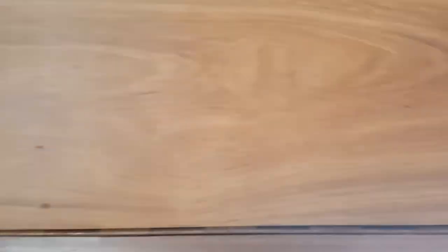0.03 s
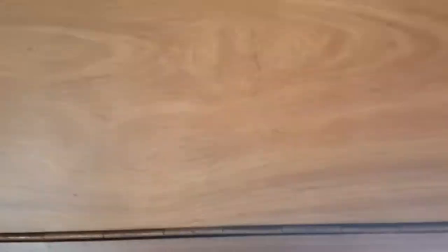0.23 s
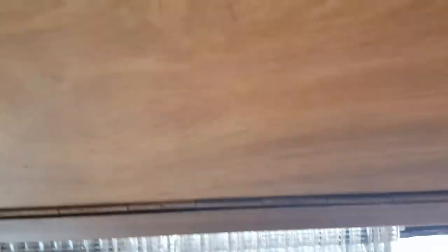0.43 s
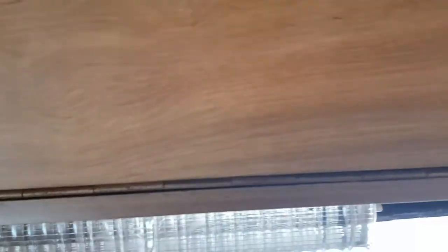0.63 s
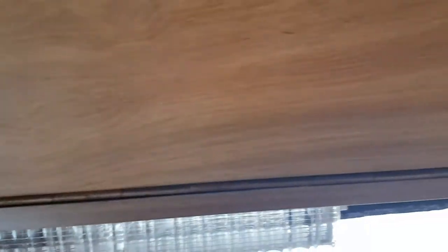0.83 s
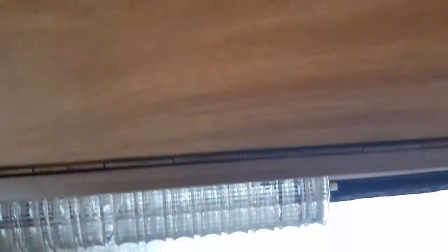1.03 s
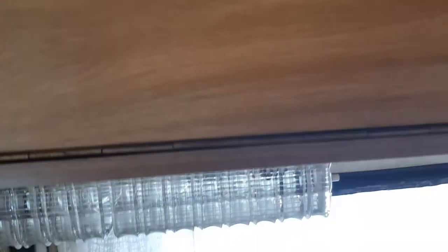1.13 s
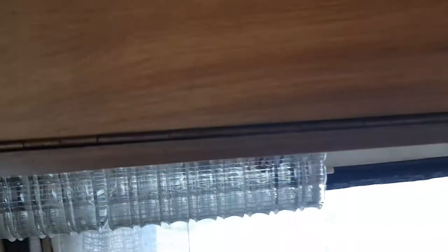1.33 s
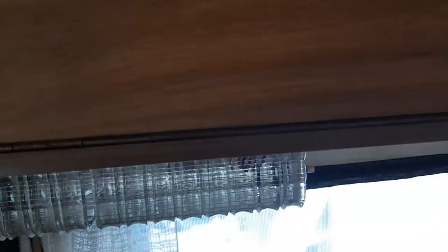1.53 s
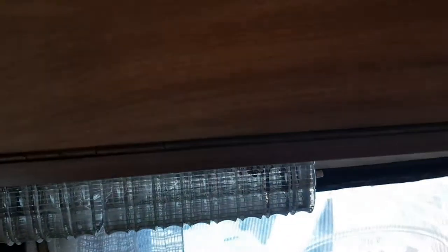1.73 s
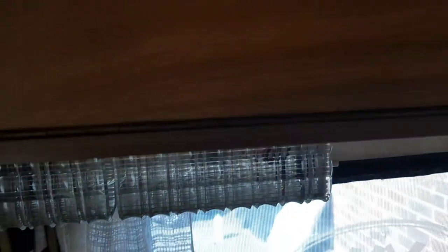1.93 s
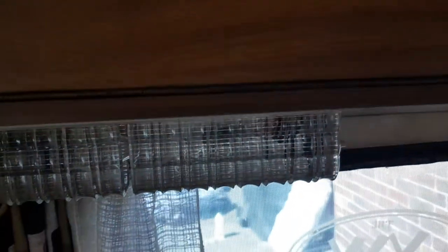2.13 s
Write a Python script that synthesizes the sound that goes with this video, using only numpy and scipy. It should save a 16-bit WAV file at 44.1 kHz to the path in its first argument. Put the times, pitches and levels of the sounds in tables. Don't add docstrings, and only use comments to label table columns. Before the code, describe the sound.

A wooden overhead locker door scrapes briefly, its catch snaps loudly with a low panel thud, then fingers knock, tick and brush until a softer second snap; close handheld stereo microphone in a small padded caravan.

```python
import sys
import numpy as np
from scipy import signal
from scipy.fft import rfft, irfft, next_fast_len
from scipy.io import wavfile
from scipy.ndimage import map_coordinates

SR = 44100
rng = np.random.default_rng(int(sys.argv[2]) if len(sys.argv) > 2 else 0)


def level_to_linear(level):
    exponent = np.asarray(level, float) / 20
    return 10 ** exponent


def to_wav(sig):
    pcm = np.clip(np.atleast_2d(sig), -1, 1) * 32767
    pcm = np.round(pcm).astype(np.int16)
    wavfile.write(sys.argv[1], SR, pcm.T)


N = 97020
SNAP_WET_DB = -3.5


def unit(x):
    return x / np.sqrt(np.mean(x ** 2) + 1e-20)


def along(points, hz):
    f, v = np.transpose(points)
    return np.interp(np.log(hz + 1), np.log(f + 1), v)


def curve(rows):
    s, v = np.transpose(rows)
    return np.interp(np.arange(N) / SR, s, v)


def wobble(rate_hz):
    knots = rng.standard_normal(int(N * rate_hz / SR) + 4)
    return map_coordinates(knots, [np.arange(N) * rate_hz / SR])


def filtered(x, response):
    m = next_fast_len(N + SR // 2)
    return irfft(rfft(x, m) * response(np.fft.rfftfreq(m, 1 / SR)), m)[..., :N]


def resonance(x, centre_hz, width_hz):
    def response(hz):
        loss = 1j * hz * width_hz
        return loss / (centre_hz ** 2 - hz ** 2 + loss)
    return filtered(x, response)


def noise(spectrum, alike):
    shared, left, right = rng.standard_normal((3, N))
    share = np.clip(alike, 0, 1)
    pair = np.sqrt(share) * shared + np.sqrt(1 - share) * np.array([left, right])
    return unit(filtered(pair, lambda hz: level_to_linear(along(spectrum, hz))))


def pan(side_db):
    return level_to_linear([[side_db], [-side_db]])


def add(out, s, sound):
    part = out[..., round(s * SR):][..., :sound.shape[-1]]
    part += sound[..., :part.shape[-1]]


def placed(sound, s):
    # time in seconds, extra lag of the left port in samples.
    contact = [(.3, 0), (.6, 4), (.69, -4), (1.03, -3), (1.13, 1), (1.3, -1)]
    extra = round(np.interp(s, *np.transpose(contact)))
    return np.array([np.roll(sound[0], max(extra, 0)), np.roll(sound[1], max(-extra, 0))])


def cabin(x):
    # frequency in Hz, t60 in seconds.
    wall_t60 = [(100, 0.3), (400, 0.072), (1500, 0.083), (8000, 0.088), (15000, 0.039)]
    mono_hz = 452
    hz, t, z = signal.stft(rng.standard_normal((2, SR // 6)), SR, nperseg=256)
    apart = (hz / (hz + mono_hz))[:, None] ** 2
    z = np.array([z[0] + apart * z[1], z[0] - apart * z[1]]) / np.sqrt(1 + apart ** 2)
    decay = level_to_linear(-60 * t / along(wall_t60, hz)[:, None])
    tail = signal.istft(z * decay, SR, nperseg=256)[1]
    late = np.pad(x, ((0, 0), (90, 0)))
    return signal.fftconvolve(late, tail / np.linalg.norm(tail[0]), axes=1)


def knocks():
    # start in seconds, peak in dB, pitch favoured by the contact in Hz, damping factor.
    blows = [(.007, -26, 205, 1.9), (.060, -32, 212, 0.26), (.2037, -9.5, 241, 0.86),
             (0.2227, -13.5, 180, 1.15), (.213, -15.5, 55.7, 0.97), (.2195, -17.5, 115.5, 0.93),
             (0.287, -33.5, 55.5, 0.72), (.347, -36, 156, 1.63), (.395, -50, 692, 1.15),
             (0.562, -46.5, 150, 1.4), (.603, -38.5, 300, 0.52), (0.62, -23.5, 97.2, 2),
             (.696, -26, 426, 3.8), (.72, -33.5, 65.5, 0.95), (.835, -42, 240, 1.5),
             (.993, -31.5, 240, 1.94), (1.001, -23, 120.5, 2.3), (1.016, -33.5, 64.4, 1.1),
             (1.080, -35.5, 404, 1.8), (1.092, -27.5, 110, 2.7), (1.141, -37.5, 207, 1.1),
             (1.339, -43.5, 680, 1.2), (1.355, -35, 180, 1.06), (1.376, -38, 750, 2.1),
             (1.517, -44.5, 210, 0.81), (1.569, -20, 542, 2.2), (1.573, -23.5, 300, 0.72),
             (1.5805, -19.5, 195.4, 1.28), (1.578, -21.5, 61.6, 1.1), (1.585, -23.5, 118, 4.5),
             (1.611, -24.5, 115, 1.9), (1.655, -40, 105, 0.94), (1.692, -37, 95, 1.4),
             (1.772, -48, 196, 0.9), (1.821, -44, 798, 1.3), (1.994, -44.5, 127, 0.97),
             (2.177, -44.5, 650, 1.44)]
    # frequency in Hz, level in dB, t60 in seconds.
    modes = [(58.7, 0.5, 0.17), (88, -10.5, .12), (119, -2, 0.13), (180, -2.5, 0.15), (206.4, -1.5, 0.095),
             (240, -1, 0.054), (300, -13, 0.076), (407.6, -2, 0.082), (456.6, -8, 0.15), (650, -10, 0.09),
             (737.7, -11.5, 0.1), (938, -13, 0.05), (1077, -16, 0.016), (1447, -14.5, 0.12)]
    spread_oct, skirt_db, rise_cycles = 0.24, -16.5, 0.38
    under_db = 9
    thud_db, wet_db = 3, -17
    out, t = np.zeros((2, N)), np.arange(SR // 4) / SR
    hz, level_db, t60 = np.transpose(modes)[..., None]
    rise = 1 - np.exp(-t * hz / rise_cycles)
    for s, db, pitch_hz, damping in blows:
        octaves = np.log2(hz / pitch_hz)
        favoured = np.exp(-.5 * (octaves / spread_oct) ** 2)
        weight = favoured + level_to_linear(skirt_db + under_db * np.minimum(octaves, 0))
        decay_db = 60 * t * np.clip(damping, .3, 4) / t60
        gain = weight * level_to_linear(level_db + 1.5 * rng.standard_normal(hz.shape) - decay_db)
        ring = (gain * np.sin(2 * np.pi * hz * t) * rise).sum(0)
        knock = level_to_linear(db + thud_db) * np.array([ring, np.roll(ring, shift=7)])
        add(out, s, knock)
        add(out, s, level_to_linear(wet_db) * cabin(knock))
    return out


def clicks():
    # start in seconds, peak in dB, pitch in Hz, fizz in dB, fizz tilt in dB per octave.
    catch = [
        (0.1978, -19, 10600, 1.5, 2.5),
        (.2000, -8, 3010, -11, -6.5),
        (.2045, -23.5, 1411, -0.5, -3.5),
        (0.2127, -13.5, 2930, -10, -5),
        (0.219, -28.5, 2778, 1.5, -31),
        (1.5690, -32, 1160, 2, -3),
        (1.5733, -20, 3030, -3.5, -5),
    ]
    ticks = [(0.35, -52, 880, 3.5, -12), (0.395, -46.5, 996, 3.5, -13.5), (0.6016, -37.5, 2850, 0, -0.5),
             (0.61, -34.5, 5820, -12, -1.5), (.622, -34, 6530, -4, -4), (.6963, -34.5, 2645, -1, 2),
             (.9935, -45, 682, 3.5, -7.5), (1.0186, -30.5, 11600, -5.5, 2.5),
             (1.0215, -22.5, 6020, -28.5, 7), (1.0867, -37, 6830, -4.5, -1), (1.1346, -31.5, 2765, -4, 3),
             (1.139, -31.5, 4630, -9.5, -1.5), (1.146, -38, 3100, -6.5, 3), (1.216, -42.5, 1940, -3, -5.5),
             (1.341, -44.5, 718, 5, -7), (1.344, -50, 2840, 0, -5), (1.375, -37, 2764, -0.5, -5.5),
             (1.4404, -62.5, 9080, -10, 3), (1.516, -60.5, 3000, -0.5, -4.5), (1.667, -59, 4870, 0, -2),
             (1.789, -51.5, 4700, -4, -4.5), (1.8450, -42.5, 5970, -3, 4), (1.936, -50.5, 12960, -24.5, 15),
             (1.991, -46.5, 4660, -10, 1.5), (2.181, -62.5, 870, -1.5, 7.5)]
    # frequency in Hz, level in dB.
    fizz_spectrum = [(400, -1.5), (900, -0.5), (3500, -8), (12000, -21), (16500, -35)]
    catch_cycles, tick_cycles = 0.5, 7.5
    fizz_t60_s, fizz_rise_s = 0.023, 0.0005
    click_db, wet_db, side_db = 3.5, -2, 0.23
    out, t = np.zeros((2, N)), np.arange(SR // 10) / SR
    fizz, band_hz = noise(fizz_spectrum, 0.48), np.fft.rfftfreq(len(t), 1 / SR)
    fizz_shape = level_to_linear(-60 * t / fizz_t60_s) * np.minimum(t / fizz_rise_s, 1) ** 2
    events = [(row, catch_cycles) for row in catch] + [(row, tick_cycles) for row in ticks]
    for (s, db, hz, fizz_db, tilt_db), cycles in events:
        turns = hz * t
        snap = -np.sin(2 * np.pi * turns) * np.minimum(turns, 1) ** 2 * level_to_linear(-20 * (turns - 1) / cycles)
        piece = fizz[:, rng.integers(N - len(t)):][:, :len(t)]
        tilt = level_to_linear(tilt_db * np.log2((band_hz + 300) / 3000))
        burst = unit(irfft(rfft(piece) * tilt, len(t))) * level_to_linear(fizz_db) * fizz_shape
        gain = level_to_linear(db + click_db) * pan(side_db)
        add(out, s, placed(gain * (snap + burst), s))
        add(out, s, level_to_linear(wet_db) * cabin(gain * (level_to_linear(SNAP_WET_DB) * snap + burst)))
    return out


def pings():
    # start in seconds, peak in dB, pitch in Hz, t60 in seconds, left over right in dB.
    rings = [(.2, -17, 740, 0.043, 1.5), (.205, -23.5, 960, 0.077, 3), (.201, -24, 1425, .07, -5),
             (.2, -20, 452, 0.066, -5), (.603, -32.5, 4030, 0.038, -5.5), (.603, -40, 2814, .04, -2.5),
             (.603, -44, 2240, 0.033, -3), (0.6968, -35, 3386, 0.021, 14), (.995, -46.5, 1474, 0.045, 7),
             (1.135, -35, 2817, 0.047, 3), (1.138, -27, 3647, 0.022, -5), (1.136, -35, 2250, 0.039, -1),
             (1.216, -42, 1570, 0.051, 6.5), (1.344, -42, 1418, 0.061, 4), (1.373, -36, 1450, 0.032, -3),
             (1.376, -40, 723, .06, -1), (1.571, -40.5, 727, .05, -1.5), (1.571, -35, 968, 0.039, -14),
             (1.571, -42, 1350, 0.043, 7), (1.821, -52, 1450, .06, 7.5), (1.845, -53, 2780, 0.033, 3)]
    # start in seconds, swell length in seconds (negative inverts the wave), level in dB,
    # start pitch in Hz, glide in Hz per second, left over right in dB.
    squeak = (1.3, -0.7, -46, 1000, 26000, -8)
    rise_s = 0.00077
    out, t = np.zeros((2, N)), np.arange(SR // 8) / SR
    s, length_s, db, hz, glide, pan_db = squeak
    swell = np.sin(np.pi * np.minimum(t / length_s, 1))
    slip = np.sin(2 * np.pi * (hz + glide * t / 2) * t) * swell
    add(out, s, level_to_linear(db) * pan(pan_db / 2) * slip)
    for s, db, hz, t60, pan_db in rings:
        ring = np.sin(2 * np.pi * hz * t) * level_to_linear(db - 60 * t / t60) * (1 - np.exp(-t / rise_s))
        ring = pan(pan_db / 2) * ring
        add(out, s, placed(ring, s))
        add(out, s, level_to_linear(SNAP_WET_DB) * cabin(ring))
    return out


def swing():
    # frequency in Hz, width in Hz, start level in dB, gain by the end in dB.
    hinge = [(205, 41, -4, -0.5), (650, 150, -9.5, -2), (1472, 150, -16.5, -0.5), (2880, 130, -9, -16),
             (3460, 240, -32, 14.5), (4220, 250, -35.5, 8)]
    level_db, end_s = -44.5, 0.19
    t, out = np.arange(N) / SR, 0
    moving = np.arange(N) < end_s * SR
    for hz, width_hz, db, gain_db in hinge:
        slip_db = gain_db * np.minimum(t / end_s, 1) + 2.5 * wobble(25) + 3 * wobble(200)
        rough = rng.standard_normal(N) + 0.78 * rng.standard_normal((2, N))
        out = out + resonance(moving * level_to_linear(db + slip_db) * rough, hz, width_hz)
    out[1] = np.roll(out[1], 29)
    return level_to_linear(level_db) * out / np.std(out[:, moving])


def hand():
    # time in seconds, level in dB.
    rub, press = [(0, -54.5), (.19, -48), (.23, -67.5), (.44, -73.5), (.56, -67.5), (.68, -57), (.8, -69),
                  (.98, -81.5), (1.03, -53), (1.26, -55), (1.31, -69.5), (1.38, -60.5), (1.46, -87),
                  (1.77, -88), (1.86, -69.5), (2.0, -65.5), (2.13, -85), (2.2, -68)], [(0, -40), (.19, -37), (.3, -54.5), (.46, -56), (.58, -43), (.75, -50.5),
                               (.84, -49.5), (.96, -56.5), (1.05, -43.5), (1.26, -44.5), (1.32, -54),
                               (1.46, -56.5), (1.54, -50.5), (1.75, -64.5), (1.86, -42.5), (1.93, -65),
                               (2.02, -50), (2.1, -56)]
    # frequency in Hz, level in dB.
    cloth, wood = [(290, -41), (500, -7.5), (659, -12.5), (1260, -11.5), (3390, -14), (16000, -30.5)], [(24, -32.5), (40, 1.5), (236, -0.5), (527, -18), (642, -18), (1500, -37),
                                  (1950, -59.5), (3300, -120)]
    grain_db = 1.5 * wobble(60) + 2 * wobble(400)
    lumps_db = 2.5 * wobble(30) + 1.5 * wobble(90)
    rustle = unit(level_to_linear(grain_db) * noise(cloth, 0.15))
    grumble = unit(level_to_linear(lumps_db) * noise(wood, 0.91))
    return level_to_linear(curve(rub)) * rustle + level_to_linear(curve(press)) * grumble


def brush():
    # start in seconds, length in seconds, level in dB.
    strokes = [
        (.33, 0.075, -67.5),
        (0.492, 0.14, -54.5),
        (0.769, 0.15, -61.5),
        (1.037, 0.11, -51),
        (1.181, 0.075, -56.5),
        (1.643, 0.065, -67),
        (1.797, 0.12, -60),
        (1.965, 0.073, -66.5),
    ]
    # frequency in Hz, width in Hz, level in dB.
    grain = [(300, 120, -2), (443, 69, 1), (650, 110, 6), (920, 48, -15), (1180, 140, -9.5),
             (1450, 130, -14.5)]
    t, stroke, out = np.arange(N) / SR, 0, 0
    for s, length_s, db in strokes:
        stroke = stroke + level_to_linear(db) * np.sin(np.pi * np.clip((t - s) / length_s, 0, 1)) ** 2
    for hz, width_hz, db in grain:
        rough = rng.standard_normal(N) + .5 * rng.standard_normal((2, N))
        out = out + resonance(level_to_linear(db + 2.5 * wobble(24)) * rough, hz, width_hz)
    return stroke * unit(out)


def scene():
    lag_s = 15 / 44100
    near = knocks() + clicks() + pings() + swing() + hand() + brush()
    return filtered(near, lambda hz: np.exp(np.outer([-1j, 1j], np.pi * hz * lag_s)))


def handling():
    shake_db = -53 + 5.5 * wobble(39)
    return level_to_linear(shake_db) * noise([(35, -1.5), (110, -3.5), (400, -57.5)], 0.93)


def microphone_hiss():
    # frequency in Hz, level in dB.
    hiss_spectrum = [(400, -13.5), (2500, -31.5), (4900, -24.5), (9000, -29.5), (15300, -18), (15900, -70)]
    return level_to_linear(-72.5) * noise(hiss_spectrum, .1)


def band_limit(x):
    return signal.sosfilt(signal.butter(12, 16940, fs=SR, output="sos"), x)


def record(dry):
    port_hz, ceiling = 42.75, .97
    shaken = dry + handling()
    thin = filtered(shaken, lambda hz: (hz ** 2 / (port_hz ** 2 - hz ** 2 + 1.4j * hz * port_hz)) ** 2)
    held = thin / (1 + np.abs(thin / ceiling) ** 10) ** .1
    return band_limit(held + microphone_hiss())


dry = scene()
out = record(dry)
to_wav(out)
```